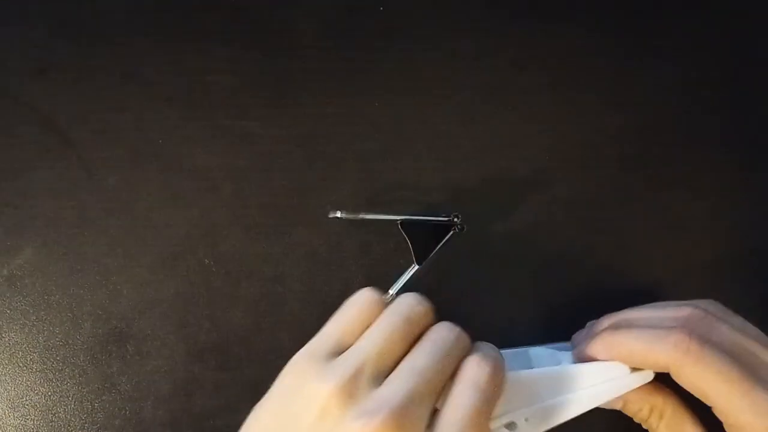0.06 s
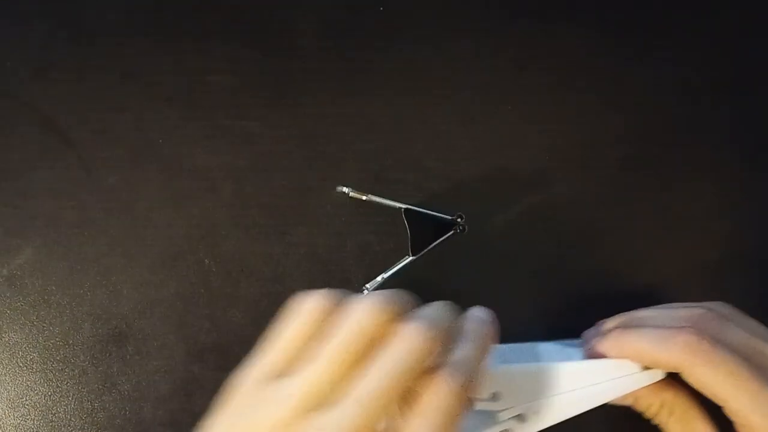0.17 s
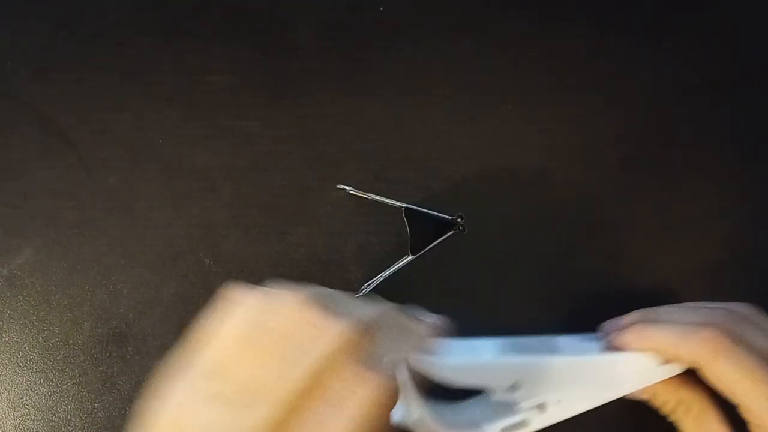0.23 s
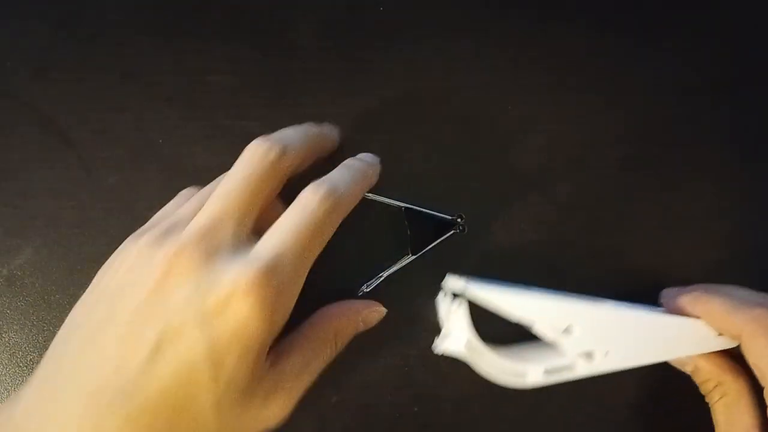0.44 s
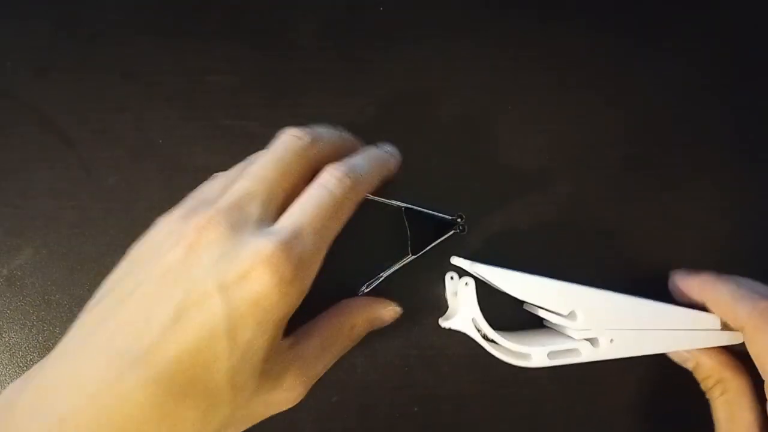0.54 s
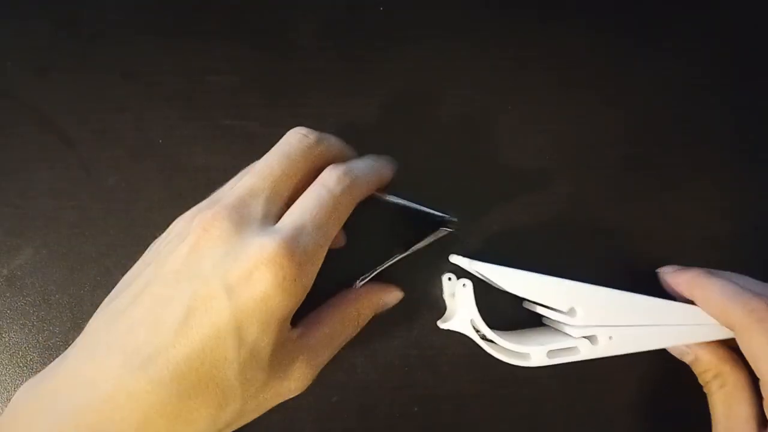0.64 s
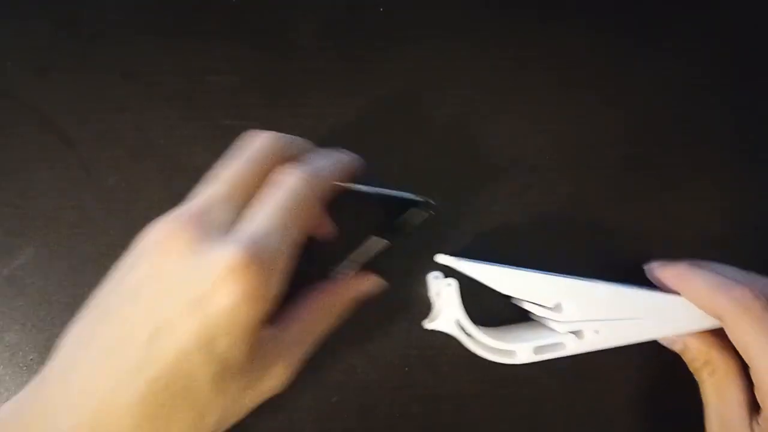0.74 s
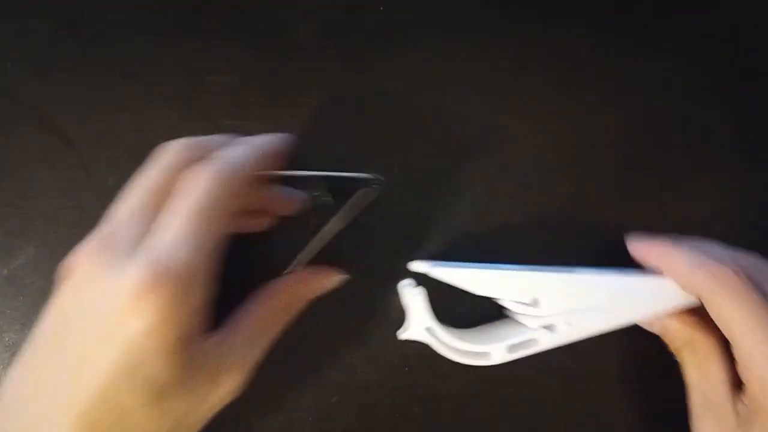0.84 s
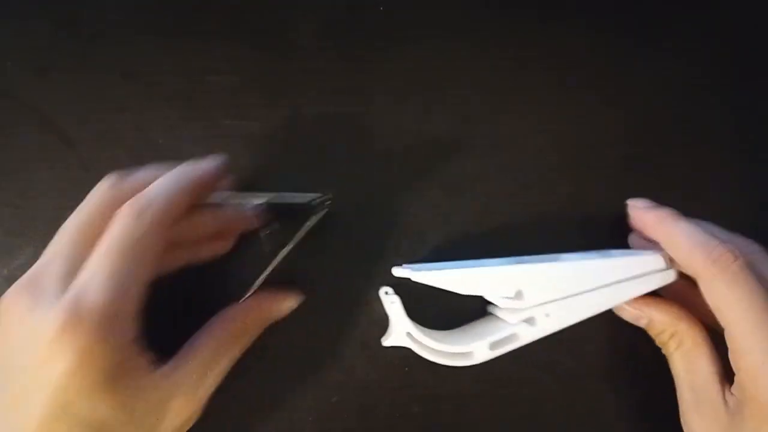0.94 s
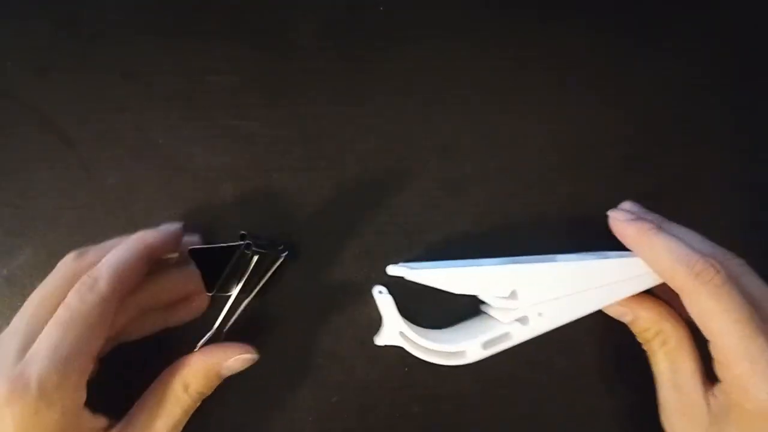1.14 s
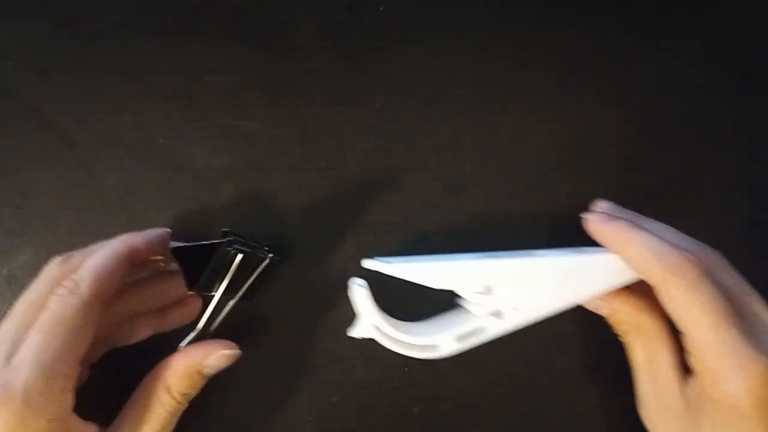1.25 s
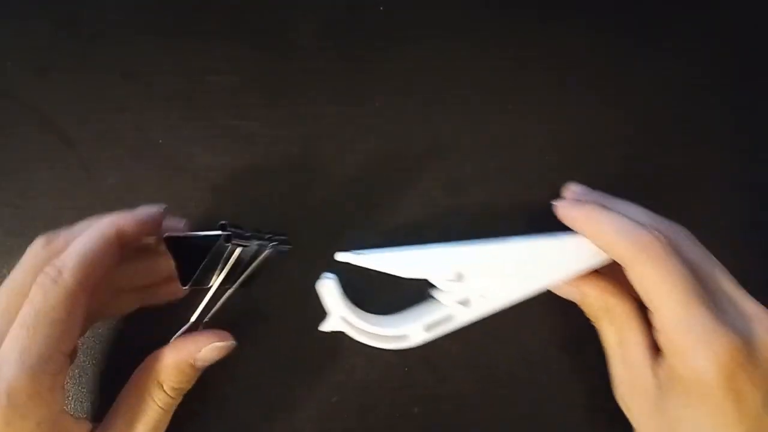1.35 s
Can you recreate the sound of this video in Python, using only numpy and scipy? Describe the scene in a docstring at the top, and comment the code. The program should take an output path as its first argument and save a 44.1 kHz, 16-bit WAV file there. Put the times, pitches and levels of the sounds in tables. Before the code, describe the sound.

Clatter on a desk as a plastic clamp lands and a binder clip is dragged.

```python
"""Faint steel clicks come first, from a binder clip on a desk, close to a phone in a small room.
A plastic clamp ticks, then knocks down on the desk, which thuds and booms. The binder clip is dragged
over the top in short pushes: stick-slip judders the board while the steel edge scratches and catches,
and the wire handles click and ring. The phone's two microphones hear it all over quiet room air."""
import sys
import numpy as np
from scipy import signal
from scipy.fft import rfft, irfft, next_fast_len
from scipy.io import wavfile
from scipy.ndimage import uniform_filter1d

SR = 44100
rng = np.random.default_rng(int(sys.argv[2]) if len(sys.argv) > 2 else 0)


def unload_wav(signal):
    """Save mono or channel-first audio to the path in sys.argv[1] as 16-bit WAV at rate SR, clipped to [-1, 1]."""
    wavfile.write(
        sys.argv[1],
        SR,
        np.round(np.clip(np.atleast_2d(signal).T, -1, 1) * 32767).astype(np.int16),
    )


N = 61739
SHARED_HZ = 640  # below this both microphones hear much the same
MIC_PHASE_RAD = 1.33  # between the two microphones, for a ringing mode
THUD_DB = -5  # the desk under any blow, before that blow's trim


def undb(db):
    """Decibels to gain."""
    return 10 ** (np.asarray(db) / 20)


def unit(x):
    """Scale to rms 1."""
    return x / np.sqrt(np.mean(x ** 2) + 1e-20)


def fade(t60):
    """Exponential decay, 60 dB down after t60 seconds."""
    return np.exp(-np.log(1000) * np.arange(N) / SR / max(t60, .001))


def walk(per_s):
    """Smooth random drift with rms 1."""
    size = int(SR / per_s)
    return unit(uniform_filter1d(uniform_filter1d(rng.standard_normal(N), size), size))


def colour(x, points, tilt_db=0):
    """Causal filter through (Hz, dB) points, tilted per octave, with unit power gain."""
    size = 2 * next_fast_len(N)
    hz, db = np.array(points, float).T
    octave = np.log2(np.clip(np.arange(size // 2 + 1) * SR / size, hz[0], hz[-1]))
    gain = unit(undb(np.interp(octave, np.log2(hz), db) + tilt_db * octave))
    cepstrum = irfft(np.log(gain))
    cepstrum[1:size // 2] *= 2  # fold to minimum phase
    cepstrum[size // 2 + 1:] = 0
    return irfft(rfft(x, size) * np.exp(rfft(cepstrum)))[..., :N]


def spread(pair):
    """Two unrelated signals become left and right: alike in the bass, apart in the treble."""
    hz = np.arange(N // 2 + 1) * SR / N
    apart = 1 / (1 + (SHARED_HZ / (hz + 1)) ** 4)
    mid, side = irfft(rfft(pair) * np.sqrt([1 - apart / 2, apart / 2]), N)
    return np.array([mid + side, mid - side])


def noise():
    """Noise as the two microphones pick it up."""
    return spread(rng.standard_normal((2, N)))


def place(x, s, db=0, pan_db=0):
    """Start a sound at a time, level and side; pan is left microphone minus right."""
    delayed = np.pad(x, ((0, 0), (int(s * SR), 0)))[:, :N]
    return delayed * undb(db + np.array([[pan_db], [-pan_db]]) / 2)


def ring(modes, length=1, phase=MIC_PHASE_RAD, wander=.014, flutter_db=2.5, chatter_per_s=350):
    """Decaying modes, made rough by the chatter of loosely held parts."""
    t = np.cumsum(1 + wander * walk(chatter_per_s)) / SR
    mics, tones = np.array([[0], [phase]]), 0
    for k, (hz, db, t60) in enumerate(modes):
        angle = 2 * np.pi * (hz * t + rng.random()) + mics * (-1) ** k
        tones += undb(db) * fade(t60 * length) * np.sin(angle)
    return tones * (1 - fade(.0018)) * undb(flutter_db * walk(chatter_per_s))


def crack(points, t60, tilt_db=0, rise_s=.003):
    """Short burst of contact noise."""
    return colour(noise() * fade(t60) * (1 - fade(rise_s)), points, tilt_db)


def grains(per_s=1500, scatter_db=3.5):
    """Random tiny impacts of uneven size, on two unrelated tracks."""
    hits = rng.random((2, N)) < per_s / SR
    sizes = undb(scatter_db * np.minimum(rng.exponential(size=(2, N)), 3.5))
    return hits * sizes * rng.choice([-1, 1], (2, N))


# The room's background. Each row: frequency in Hz, gain in dB.
AIR_COLOUR = [(25, -16), (60, -5), (130, 11), (200, -13.5), (400, -8.5), (1000, -29.5), (3000, -12),
              (7000, -22), (12000, -31), (15000, -21.5)]
def room_air():
    """Quiet, steady air all around the phone."""
    return undb(-74.5) * colour(noise(), AIR_COLOUR)


def room(x, low_t60=.33, treble_t60=.29, build_s=.0062, gap_s=.005):
    """Hard walls a short way off return a tail whose treble dies sooner."""
    wash = noise()
    low = signal.sosfilt(signal.butter(2, 3000, fs=SR, output="sos"), wash)
    tail = (low * fade(low_t60) + (wash - low) * fade(treble_t60)) * (1 - fade(build_s))
    return signal.fftconvolve(x, place(unit(tail) / np.sqrt(N), gap_s), axes=1)[:, :N]


# Resonances of the desk top. Each row: frequency in Hz, width in Hz, gain in dB.
DESK_MODES = [(228.2, 24.7, -6.5), (283, 31.4, -6.5), (357, 41, -0.5), (477, 25.3, -3), (537.6, 41.4, -6.5),
              (648.3, 71, -9.5), (811.4, 57.4, -9.5)]
# The desk's overall tone at the phone. Each row: frequency in Hz, gain in dB.
DESK_COLOUR = [(30, -40), (70, -3), (110, -4), (165, -12.5), (215, -3), (700, -3), (1200, -6),
               (2500, -11.5), (8000, -38.5)]
def desk(force):
    """The board answers a force with its broad low resonances."""
    body = sum(undb(db) * signal.lfilter(*signal.iirpeak(hz, hz / width, SR), force) * (-1) ** k
               for k, (hz, width, db) in enumerate(DESK_MODES))
    return colour(body, DESK_COLOUR)


def thud():
    """One blow to the board, with peak 1."""
    blow = desk(signal.unit_impulse(N)) * fade(t60=.07)
    return blow / np.abs(blow).max()


# The clamp's jaws. Each row: start in seconds, level in dB, main mode's pitch in Hz, its gain in dB and
# t60 in seconds, ring length factor, tilt in dB per octave, room trim in dB, pan in dB.
TICKS = [(0.1533, -50.5, 2600, 16, 0.019, 0.23, -3, -12.5, 15.5),
         (0.1538, -49.5, 2000, 13, .034, 0.49, 3, -2.5, 5), (0.1938, -42.5, 4650, 5, 0.019, 0.35, 1, 10, 1),
         (0.1965, -42, 1226, 4, 0.045, 0.4, -3.5, 8, 3.5),
         (0.8062, -49.5, 2563, 3.5, .07, 0.49, -8.5, 1.5, 6.5),
         (0.808, -51.5, 1510, 6.5, 0.11, 0.75, -8.5, -3, 4),
         (1.287, -65.5, 1227, 9, 0.14, 0.82, -1, 6.5, 0)]
# Modes of the jaws. Each row: frequency in Hz, gain in dB, full-length t60 in seconds.
JAW_MODES = [(773, -3, 0.2), (2016, -6, 0.23), (2600, -5.5, 0.079), (2900, -4, .06), (3480, -2, 0.067),
             (4220, -3, 0.071), (5000, -9.5, 0.018), (6230, -16, 0.048)]
# Contact noise of a tick. Each row: frequency in Hz, gain in dB.
TICK_COLOUR = [(30, -46.5), (100, -38), (200, -22.5), (800, -4.5), (2000, -1.5), (3500, 1), (4600, -2.5),
               (6000, -7), (9000, -26.5), (15000, -36)]
def jaw_ticks(crack_t60=.069, ring_db=-2.5, room_db=-8.5):
    """Light plastic ticks close by; the grip sets which mode stands out and how long it rings."""
    out, send = 0, 0
    for s, db, hz, main_db, main_t60, length, tilt_db, room_trim, pan_db in TICKS:
        modes = ring(JAW_MODES, length) + ring([(hz, main_db, main_t60)])
        contact = crack(TICK_COLOUR, crack_t60 * np.sqrt(length), tilt_db)
        tick = place(contact + undb(ring_db) * modes, s, db, pan_db)
        out += tick
        send += undb(room_trim) * tick
    return out + undb(room_db) * room(send)


# The binder clip's handles. Each row: start in seconds, level in dB, ring trim in dB,
# ring length factor, tilt in dB per octave, pan in dB.
CLICKS = [(0.002, -47.5, -7, .4, -7.5, -13), (0.009, -52, 0, 0.51, -0.5, -2.5),
          (0.015, -48, 0.5, 0.36, -6.5, 21), (0.0228, -41.5, 5.5, .3, -5.5, -2),
          (0.0306, -46.5, -2, 0.59, -4, 9), (0.099, -50, -1, 0.51, -6, 7.5), (0.574, -46.5, -9, .5, 1, 1.5),
          (0.9065, -29.5, -14.5, 0.87, -2, -3.5), (0.9098, -35.5, -10, 1, -0.5, 1),
          (0.9158, -38.5, -5, 0.77, -11, 10.5)]
# Modes of the binder clip. Each row: frequency in Hz, gain in dB, full-length t60 in seconds.
STEEL_MODES = [(1950, 4.5, 0.061), (2627, -12, 0.31), (2770, -2, 0.34), (2744, 2, 0.1), (2810, -3, 0.2),
               (2896, -4.5, 0.17), (3060, -5.5, 0.2), (3200, -11.5, 0.081), (4200, -10, 0.05),
               (4350, -12, .08), (5160, -17.5, 0.069), (6800, -21, 0.058), (9150, -33, .08),
               (10340, -32.5, 0.092)]
# The snap of wire on steel. Each row: frequency in Hz, gain in dB.
SNAP_COLOUR = [(60, -51.5), (130, -38), (250, -23.5), (600, -6), (1500, -1.5), (2000, -13), (2350, 0.5),
               (2850, 9.5), (3500, -1.5), (4500, -2.5), (7000, -10.5), (10000, -14), (15000, -23.5)]
def handle_clicks(snap_t60=.035, ring_db=-5.5, room_db=-7):
    """Wire handles snap against the spring steel and ring on, briefly when a finger rests on them."""
    snaps, rings = 0, 0
    for s, db, ring_trim, length, tilt_db, pan_db in CLICKS:
        snaps += place(crack(SNAP_COLOUR, snap_t60, tilt_db), s, db, pan_db)
        steel = ring(STEEL_MODES, length, wander=.03)  # the loose handles blur the pitch
        rings += place(steel, s, db + ring_db + ring_trim, pan_db)
    return snaps + rings + undb(room_db) * room(snaps + undb(-2) * rings)


# Hiss of the sliding edge. Each row: frequency in Hz, gain in dB.
HISS_COLOUR = [(2000, -16), (6000, -15), (9000, -10), (12000, -2), (15000, -2.5)]
def edge_hiss(t, centre_s=.569, half_s=.028, db=-61.5):
    """The fastest stretch of the drag hisses."""
    return unit(colour(grains(), HISS_COLOUR)) * undb(db) * np.exp(-((t - centre_s) / half_s) ** 2)


# Brief scrapes. Each row: centre and half length in seconds, level in dB, pitch and width in Hz.
SCRAPES = [(0.505, 0.017, -60, 4290, 260), (0.552, 0.01, -53.5, 2750, 260),
           (1.107, 0.026, -62.5, 2070, 222)]
def edge_scrapes(t):
    """For a moment the rubbing excites one narrow resonance of the steel."""
    out = 0
    for s, half_s, db, hz, width_hz in SCRAPES:
        band = signal.butter(2, [hz - width_hz / 2, hz + width_hz / 2], "bandpass", fs=SR, output="sos")
        out += unit(signal.sosfilt(band, grains())) * undb(db) * np.exp(-((t - s) / half_s) ** 2)
    return out


# Snags along the desk top. Each row: start in seconds, level in dB, thud trim in dB.
CATCHES = [(0.395, -61, 13), (0.407, -43, 15), (0.608, -45.5, 0), (0.665, -46, 11), (0.747, -49, -21),
           (1.0558, -45.5, -6.5), (1.095, -52.5, 9), (1.13, -54.5, -1), (1.3604, -51.5, -18)]
# Contact noise of a snag. Each row: frequency in Hz, gain in dB.
CATCH_COLOUR = [(200, -10), (800, -8), (1300, 15), (1700, 5), (2100, 7.5), (2700, -7), (3600, -19.5),
                (5500, -22), (8000, -39)]
# Modes of the steel edge. Each row: frequency in Hz, gain in dB, t60 in seconds.
EDGE_MODES = [(1280, -1.5, 0.02), (2034, -3, 0.048), (2225, -11, 0.055), (5770, -21.5, 0.068)]
def edge_catches(ring_db=-3.5):
    """The steel edge catches on the desk and lets go, jolting the board."""
    board, out = thud(), 0
    for s, db, thud_trim in CATCHES:
        steel = crack(CATCH_COLOUR, t60=.055) + undb(ring_db) * ring(EDGE_MODES)
        out += place(steel + undb(THUD_DB + thud_trim) * board, s, db)
    return out


# The rocking tone. Each row: time in seconds, pitch in Hz, level in dB.
ROCKING = [(0, 361.6, -61), (0.07, 364, -72.5), (0.22, 363.7, -75), (0.27, 364, -43), (0.411, 370, -42.5),
           (0.53, 349.3, -52), (0.64, 351.9, -49), (0.765, 366.1, -48.5), (0.799, 366.1, -77),
           (0.86, 369.7, -72), (0.895, 325, -48), (0.961, 334.8, -51.5), (1.01, 372.2, -47),
           (1.1, 356.1, -43.5), (1.184, 360.8, -56.5), (1.22, 365, -85.5), (1.29, 373, -75),
           (1.361, 374, -45.5)]
def rocking(t, wander=.075, flutter_db=3, per_s=109):
    """The moving binder clip rocks on its edge: a rough tone, the same at both microphones."""
    s, hz, db = np.array(ROCKING).T
    turns = np.cumsum(np.interp(t, s, hz) * (1 + wander * walk(per_s))) / SR
    tone = np.sin(2 * np.pi * turns) * undb(flutter_db * walk(per_s))
    return unit(tone) * undb(np.interp(t, s, db))


# The board's bass within the judder. Each row: time in seconds, gain in dB.
JUDDER_BASS = [(0, -12), (0.25, 2.5), (0.5, 5.5), (0.7, 7), (0.76, -7), (0.95, 6), (1.1, 4), (1.33, -4)]
def juddering(t, steady_s=.03, bass_hz=294.6):
    """Stick-slip pulses shake the board; its lowest resonances come and go as the binder clip moves."""
    shake = unit(desk(spread(grains(per_s=380, scatter_db=1.5))))
    power = uniform_filter1d(np.mean(shake ** 2, axis=0), int(steady_s * SR))
    shake /= np.sqrt(power + 1e-6)  # the hand holds the strength steady
    bass = signal.sosfiltfilt(signal.butter(4, bass_hz, fs=SR, output="sos"), shake)
    return shake - bass + bass * undb(np.interp(t, *np.array(JUDDER_BASS).T))


# The hand's pushes. Each row: time in seconds, push strength in dB, scratch level in dB.
PUSHES = [(0, -54, -53.5), (0.051, -68, -79), (0.209, -71, -74), (0.268, -32, -34), (0.331, -42, -41.5),
          (0.4, -40.5, -50.5), (0.455, -42.5, -51), (0.48, -39, -49.5), (0.529, -40, -48.5),
          (0.583, -40, -43), (0.635, -41, -45.5), (0.659, -45.5, -60), (0.668, -42.5, -51.5),
          (0.717, -43, -58.5), (0.735, -52.5, -73), (0.755, -42.5, -60), (0.788, -52.5, -63.5),
          (0.814, -47, -53), (0.865, -52.5, -88), (0.9, -46.5, -58), (0.945, -43.5, -63),
          (0.98, -44, -58.5), (1.035, -45, -60), (1.07, -40.5, -53), (1.105, -41.5, -59), (1.135, -42, -64),
          (1.155, -53, -74), (1.187, -58, -89), (1.208, -78.5, -94.5), (1.28, -73.5, -85.5),
          (1.325, -55, -95), (1.347, -59, -94), (1.358, -52.5, -105), (1.39, -39.5, -53.5)]
# Steel scratching the desk top. Each row: frequency in Hz, gain in dB.
SCRATCH_COLOUR = [(200, -15), (700, 5), (1290, 5.5), (1700, 2.5), (2100, 0.5), (2800, -6.5), (4000, -12),
                  (5800, -15), (7500, -31.5), (11000, -44.5), (15000, -46)]
def dragging(firm_db=-37, growth=.35, room_db=-7.5):
    """The binder clip is pushed along near the phone; below a firm push its judder dies away quickly."""
    t = np.arange(N) / SR
    s, pushes_db, scratch_db = np.array(PUSHES).T
    push_db = np.interp(t, s, pushes_db)
    judder = juddering(t) * undb(push_db + growth * (push_db - firm_db))
    rock = rocking(t)
    scratch = unit(colour(spread(grains()), SCRATCH_COLOUR)) * undb(np.interp(t, s, scratch_db))
    edge = place(scratch + edge_hiss(t) + edge_catches() + edge_scrapes(t), 0, pan_db=1.5)
    return judder + rock + edge + undb(room_db) * room(edge + undb(-15) * judder)


# Modes of the desk frame. Each row: frequency in Hz, gain in dB, t60 in seconds.
FRAME_MODES = [(74.6, 0, 0.26), (100, -2.5, 0.36), (131.7, -1, 0.33)]
def frame_boom(rise_s=.028):
    """The frame booms after the hardest knock, the same at both microphones."""
    return place(ring(FRAME_MODES)[:1] * (1 - fade(rise_s)), s=.28, db=-44)


def clack(hz, db, t60, apart_hz=2000, low_cut_hz=220):
    """The clamp's struck edge rings briefly, with its bass cut away."""
    phase = MIC_PHASE_RAD * min(hz / apart_hz, 1)  # low clacks reach the microphones more in phase
    tone = ring([(hz, db, t60)], phase=phase)
    return signal.sosfilt(signal.butter(2, low_cut_hz, "highpass", fs=SR, output="sos"), tone)


# The clamp's landing. Each row: start in seconds, level in dB, thud and ring trims in dB, clack pitch
# in Hz, its gain in dB and t60 in seconds, tilt in dB per octave, room trim in dB, pan in dB.
KNOCKS = [(0.2317, -24, 6, -5, 1543, -5, 0.032, 0, 6.5, 2.5),
          (0.2401, -27.5, -3.5, -5.5, 4550, 0, 0.018, 0.5, -4.5, 6.5),
          (0.2571, -21, -1, -5, 537, 5.5, 0.012, -1.5, -1.5, -3.5),
          (0.2597, -23, -10.5, -2, 2140, 11.5, 0.014, -0.5, -0.5, -6),
          (0.2622, -32, -13.5, -7.5, 1330, 15.5, .018, -3, -6, 2.5)]
# Modes of the clamp's body. Each row: frequency in Hz, gain in dB, t60 in seconds.
CLAMP_MODES = [(1054.3, 0.5, 0.17), (1214, -12.5, 0.14), (1287, -1, 0.12), (1517, -5, 0.32),
               (1900, 1.5, 0.11), (2002, -3.5, 0.069), (2166, -12, 0.14), (2645, -12, 0.054),
               (3376, -15, 0.16)]
# Contact noise of a knock. Each row: frequency in Hz, gain in dB.
KNOCK_COLOUR = [(30, -39), (100, -12.5), (300, -5), (700, -8), (1300, -7.5), (2300, 4.5), (3500, -3.5),
                (5200, -11), (7000, -21), (10000, -32.5), (15000, -36.5)]
def clamp_knocks(crack_t60=.028, ring_db=-7.5, room_db=-2):
    """Close to the phone the clamp lands on one edge, then the other: crack, clack, ring and thud."""
    board, out, send = thud(), 0, 0
    for s, db, thud_trim, ring_trim, hz, clack_db, clack_t60, tilt_db, room_trim, pan_db in KNOCKS:
        plastic = undb(ring_db + ring_trim) * ring(CLAMP_MODES) + clack(hz, clack_db, clack_t60)
        body = place(plastic + undb(THUD_DB + thud_trim) * board, s, db, pan_db)
        contact = place(crack(KNOCK_COLOUR, crack_t60, tilt_db), s, db, pan_db)
        out += contact + body
        send += undb(room_trim) * (contact + undb(-9) * body)  # the room answers mostly the cracks, the rings only faintly
    return out + frame_boom() + undb(room_db) * room(send)


def scene():
    """All the handling, heard from close by over quiet room air."""
    return clamp_knocks() + handle_clicks() + jaw_ticks() + dragging() + room_air()


def record(dry, top_hz=15500):
    """The phone cuts the highest treble steeply."""
    return signal.sosfilt(signal.ellip(8, .2, 70, top_hz, fs=SR, output="sos"), dry)


dry = scene()
out = record(dry)
unload_wav(out)
```